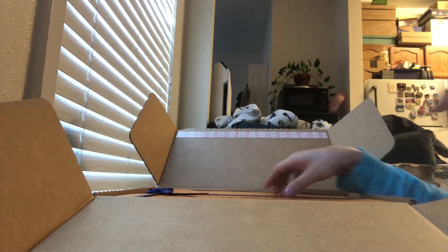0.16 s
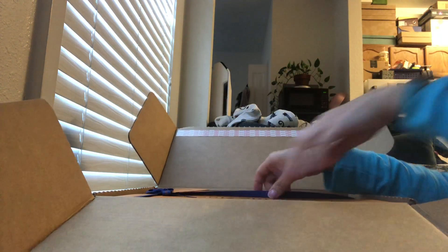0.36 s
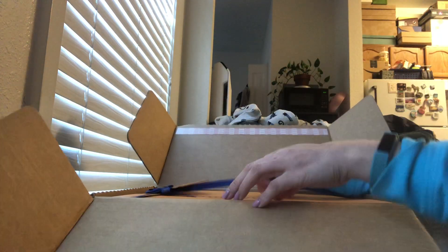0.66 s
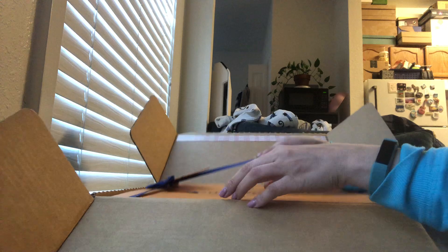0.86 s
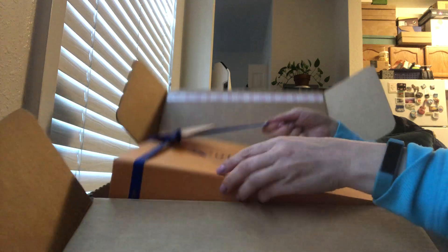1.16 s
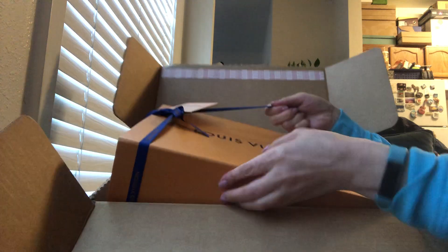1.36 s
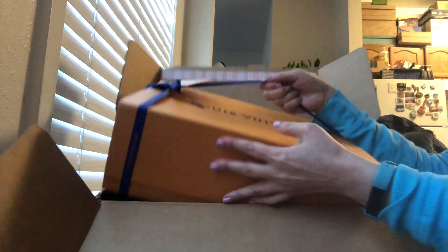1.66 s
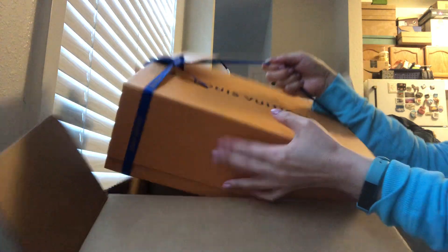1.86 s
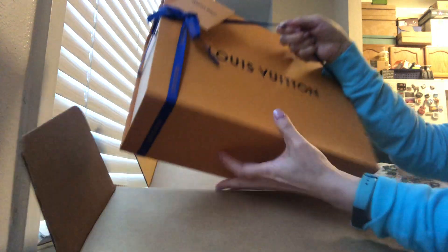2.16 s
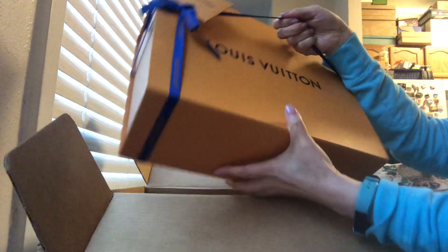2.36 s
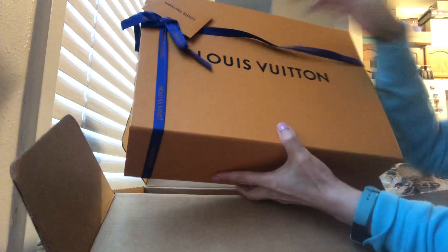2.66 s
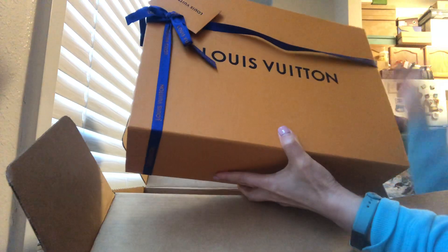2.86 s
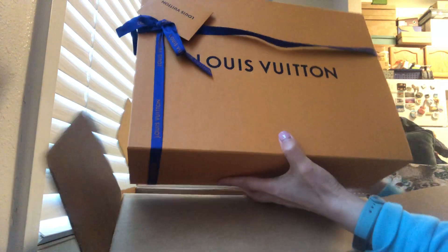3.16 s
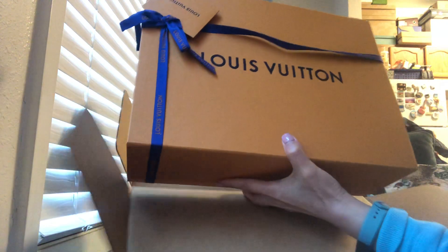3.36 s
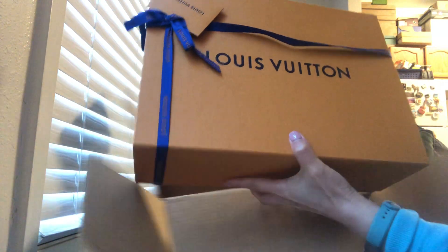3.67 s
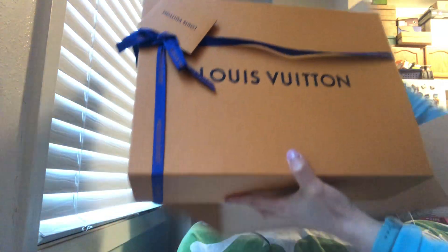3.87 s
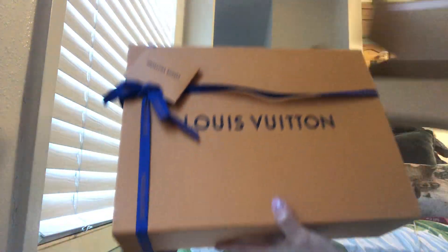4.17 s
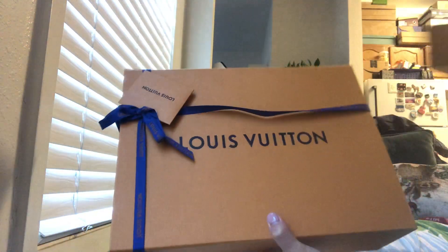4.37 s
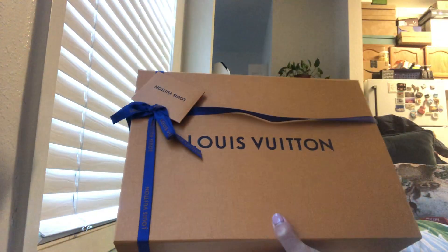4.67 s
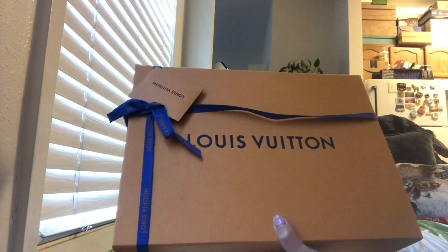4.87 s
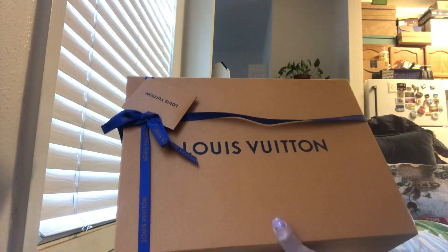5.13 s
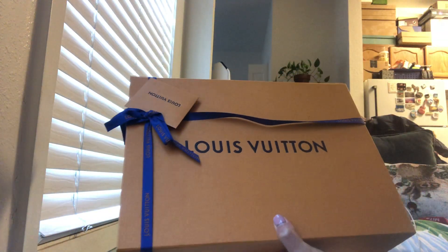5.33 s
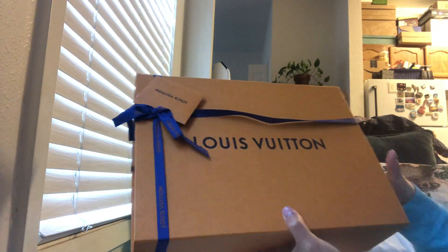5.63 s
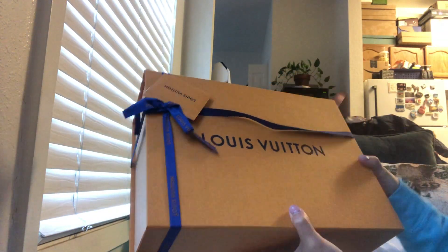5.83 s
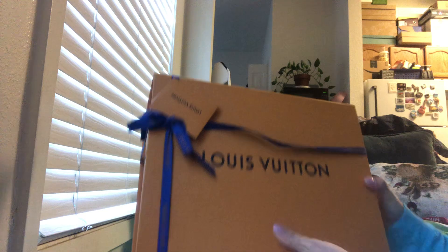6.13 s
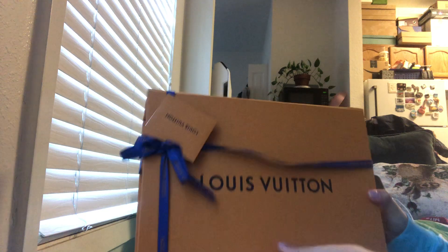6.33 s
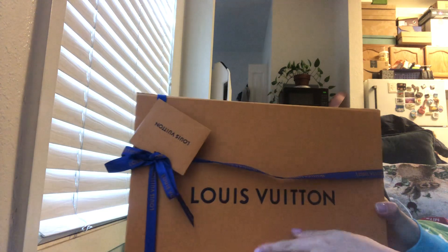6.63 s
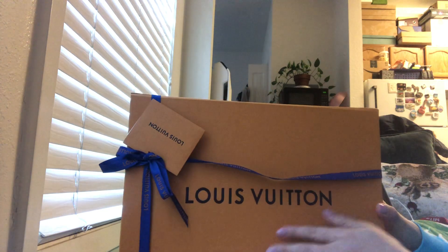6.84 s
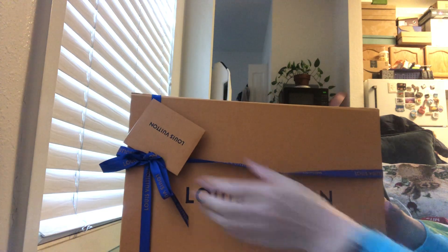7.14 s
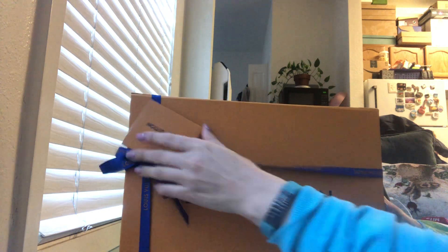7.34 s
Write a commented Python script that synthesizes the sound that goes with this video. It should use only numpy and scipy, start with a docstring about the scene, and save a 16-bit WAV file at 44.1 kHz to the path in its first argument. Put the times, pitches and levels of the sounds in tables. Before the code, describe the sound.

Dry card-on-card sliding with small clicks, two hollow thumps and further carton bumps, then quiet handling rustles and one sharp closing tap indoors.

```python
"""Card slides on card as a stiff gift box is pulled out of a corrugated carton; later hands shift and stroke it.
Dense stick-slip clicks drive the modes of the boxes (panels, hollow, boom) and make a dry hiss with small snaps.
The carton is pushed aside and dropped: knocks strike the same modes and add a bright crack.
Skin squeaks once on the glossy card, as a short sine; shaped noise is the quiet living room."""
import sys
import numpy as np
from scipy import signal
from scipy.fft import rfft, irfft
from scipy.io import wavfile
from scipy.ndimage import uniform_filter1d

SR = 44100
rng = np.random.default_rng(int(sys.argv[2]) if len(sys.argv) > 2 else 0)


def master_out(mix):
    """Clip the mix to full scale and print it as 16-bit PCM to the path in sys.argv[1]."""
    frames = np.transpose(np.atleast_2d(mix))
    ceiling = np.clip(frames, -1, 1)
    pcm = np.round(ceiling * 32767).astype(np.int16)
    wavfile.write(sys.argv[1], SR, pcm)


N = 330750

# Room tone spectrum: f/Hz, relative density/(dB per Hz)
ROOM_SPECTRUM = [(15, -38), (25, -29), (82, 10), (141, -3), (263, 1.5), (796, -9), (936, -9.5),
                 (1560, -16.5), (4870, -19), (14800, -30), (16000, -24)]
# Squeak of skin on glossy card: start t/s, length/s, f/Hz, peak level/dB
SKIN_SQUEAK = (7.168, .028, 1900, -62)
# Modes of the boxes, in three families: f/Hz, relative level/dB, T60/s
BOOM_MODES = [(55, -24.5, 0.99), (75.5, 0, 0.43), (109.7, -15.5, 0.15)]
HOLLOW_MODES = [(138.4, -7, 0.41), (183, 6.5, 0.24), (220.2, 3.5, 0.14), (252.6, 11.5, 0.13),
                (312.3, 2.5, 0.15), (370, 4.5, 0.14)]
PANEL_MODES = [(426, 15, 0.031), (530, 2, 0.069), (623.4, -0.5, 0.044), (710.6, 12, 0.023),
               (808, 6.5, 0.03), (946, 10.5, 0.027), (1072, 9.5, 0.03), (1202, 10.5, 0.019),
               (1324, 10.5, 0.018), (1495, 0, 0.067), (1570, 2.5, 0.018), (1860, -1, 0.065),
               (1960, -6.5, 0.09), (2463, -1.5, 0.047)]
# Knocks and snaps: t/s, panels peak level/dB, centre of excited panel modes f/Hz,
# hollow re panels/dB, centre of excited hollow modes f/Hz, boom re panels/dB, crack re panels/dB
KNOCK_EVENTS = [(0.063, -49, 480, -10, 172, -25, -20), (0.127, -52, 670, -14, 240, -4, 4),
                (0.24, -52, 616, -7, 395, -17, -19), (0.341, -42, 930, -27, 261, -32, -16),
                (0.49, -42, 1180, -7, 283, -35, -17), (0.701, -50, 454, 6.5, 382, -13, -19),
                (0.743, -41.5, 651, -13, 299, -25, -6), (0.773, -42, 611, -9, 196, -31, -17),
                (0.819, -37.5, 660, -11, 180, -32, -9.5), (0.859, -37, 595, -21, 180, -30, -17),
                (1.092, -51, 1120, -3, 180, -11.5, 4.5), (1.441, -40, 2060, -10, 229, -32, -15),
                (1.459, -37, 1350, -35, 175, -40, -19), (1.64, -38.5, 433, -0.5, 188, -45, -14),
                (1.912, -36.5, 660, 6, 371, -20, -23), (1.924, -55, 716, 17.5, 229, -20, -16),
                (2.017, -19.5, 580, -7.5, 212, -16, -16), (2.056, -32.5, 686, -2, 170, -13, 1),
                (2.065, -40, 433, -5, 194, -15, -12), (2.082, -18, 506, -2.5, 236, -30, -7.5),
                (2.276, -36.5, 990, -11.5, 295, -33, 4), (2.289, -33, 1210, -25, 175, -28, -17),
                (2.474, -45.5, 433, 4.5, 235, -13, -16), (2.625, -49.5, 845, -11, 264, -36, -10),
                (2.667, -45.5, 1140, -9.5, 183, -27, -3), (2.721, -46.5, 1200, -13, 398, -35, 0),
                (2.746, -48, 1220, -14, 261, -28, 0), (2.79, -57.5, 550, -2, 296, -9, 5.5),
                (3.03, -38, 430, 6, 403, -8, -21), (3.339, -42.5, 567, 6.5, 209, -8, -16),
                (3.603, -24.5, 802, -2.5, 217, -6, -5), (3.794, -25.5, 535, -10.5, 320, -29, -6),
                (3.832, -34, 960, -1, 180, -38, -2.5), (3.956, -44, 433, -20, 202, -35, -37),
                (4.057, -60.5, 533, -10, 242, 9.5, -14), (4.249, -55, 576, -6, 205, -13, -13),
                (4.647, -50.5, 1060, -15, 358, -19, -8), (4.799, -52, 433, 0, 398, -17, -20),
                (4.853, -52, 1320, 0, 231, -10, -7), (4.99, -38, 1080, -19, 250, -23, -10),
                (5.055, -42, 433, -9, 390, 5, -14), (5.067, -40, 444, -1, 223, 0, -12),
                (5.103, -47, 433, 8, 187, 15.5, -16), (5.503, -51, 940, -21, 398, -18, -6),
                (5.588, -56, 910, -13, 172, -18, -3), (5.618, -45.5, 487, -5, 370, -23, -10),
                (5.881, -38, 440, -2.5, 308, -33, -21), (5.976, -57.5, 1090, -3, 229, -29, 0),
                (5.995, -45, 1050, -8, 299, -22, -5.5), (6.042, -42, 560, -13, 345, -19, -19),
                (6.114, -53, 738, -15, 363, -15, 7), (6.243, -55, 1030, -18, 231, -26, 5.5),
                (6.265, -50, 1160, -14, 366, -28, 1), (6.322, -37.5, 1190, -5, 188, -29, -1.5),
                (6.35, -66, 678, -11, 143, -10, -8), (6.412, -51, 956, 7, 363, -34, 4.5),
                (6.569, -39, 756, -28, 398, -29, -11), (7.064, -42, 1200, -27, 191, -27, -12),
                (7.351, -27, 970, -41, 320, -42, -18)]
# Dry friction spectrum: f/Hz, relative density/(dB per Hz)
HISS_SPECTRUM = [(1060, -23), (1800, -2.5), (2160, -2), (2670, -3), (7700, -11.5), (11500, -19.5),
                 (14600, -12), (16000, 0.5)]
# Rubs of card, ribbon and skin: full strength t/s (sudden rubs move to a knock), rise/s, hold/s,
# panels level/dB, centre of excited panel modes f/Hz, hollow, hiss and fine hiss re panels/dB
RUB_EVENTS = [(0.063, 0.045, 0.012, -58, 590, 1, -8, -25), (0.116, 0.02, 0.0088, -61, 655, 4, -2.5, -11),
              (0.24, 0.0013, 0.1, -41, 825, -7, -9, -28.5), (0.367, 0.032, 0.075, -58, 746, 0, -0.5, -9.5),
              (0.502, 0.042, 0.039, -42.5, 950, -7, -14.5, -30.5),
              (0.584, 0.016, 0.088, -57, 815, 2, -3.5, -13.5),
              (0.738, 0.0047, 0.057, -65.5, 820, -5, 3, -7), (0.835, 0.038, 0.21, -53, 875, 1, -9.5, -20),
              (1.097, 0.005, 0.019, -54.5, 1080, -1, -1, -5), (1.13, 0.023, 0.045, -54, 1050, 1, -7, -13),
              (1.193, 0.038, 0.019, -50.5, 970, -4, 3, -6),
              (1.256, 0.04, 0.11, -51.5, 820, -4, -9.5, -23.5),
              (1.409, 0.069, 0.017, -52.5, 1020, 0.5, -5.5, -19),
              (1.438, 0.015, 0.014, -54, 1100, 0, 2.5, -15.5),
              (1.52, 0.06, 0.091, -49.5, 870, -3.5, -7.5, -17.5),
              (1.638, 0.064, 0.035, -47.5, 830, 4, -5.5, -15.5),
              (1.715, 0.039, 0.18, -49, 705, -6, -9, -18), (1.918, 0.025, 0.15, -52, 855, 1, -2, -9.5),
              (2.017, 0.0022, 0.02, -39, 686, 6, -4.5, -17.5),
              (2.085, 0.0035, 0.055, -44.5, 630, 9.5, -11, -21),
              (2.154, 0.03, 0.085, -50.5, 784, -1, -6, -10.5),
              (2.266, 0.0016, 0.011, -48.5, 1120, -4, -8.5, -15),
              (2.447, 0.12, 0.073, -71, 490, 12, -4, -7), (2.554, 0.09, 0.015, -58.5, 770, -0.5, -5.5, -14),
              (2.623, 0.0084, 0.14, -66, 1010, -8, 1.5, -5.5), (2.832, 0.032, 0.17, -73, 884, -0.5, 0, -2),
              (3.035, 0.0057, 0.12, -48.5, 696, -1, -8, -13),
              (3.14, 0.02, 0.095, -58, 630, 3.5, -10.5, -15), (3.27, 0.056, 0.06, -56.5, 710, 4, -1, -5.5),
              (3.39, 0.09, 0.082, -51.5, 537, -1, -10.5, -15.5),
              (3.528, 0.073, 0.089, -49, 700, 1, -10, -17.5),
              (3.591, 0.0019, 0.039, -41.1, 640, 5.5, -11, -24),
              (3.711, 0.12, 0.015, -46, 880, -11, -5, -10.5),
              (3.742, 0.015, 0.015, -45.5, 1060, -3.5, -1.5, -4),
              (3.821, 0.0029, 0.073, -52.5, 920, 5, -8, -12.5),
              (3.954, 0.01, 0.063, -53, 620, 3.5, -12.5, -21.5), (4.257, 0.02, 0.11, -67, 734, 2, -17, -33),
              (4.447, 0.021, 0.085, -65.5, 590, -0.5, -14, -33),
              (4.645, 0.11, 0.019, -61.5, 1100, -5.5, -3, -11.5),
              (4.703, 0.02, 0.11, -67, 610, -2, -9, -21), (4.853, 0.023, 0.15, -65, 720, 10.5, -5, -34),
              (4.987, 0.0021, 0.038, -47.5, 1010, -6, -5, -18.5),
              (5.057, 0.0041, 0.018, -48, 550, 10.5, -5.5, -11.5),
              (5.121, 0.023, 0.13, -61, 860, 5, -2, -9.5), (5.266, 0.02, 0.076, -73.5, 656, -9, -2, -5),
              (5.505, 0.0029, 0.01, -64, 800, -3, -8, -26), (5.608, 0.015, 0.044, -63, 610, -9, -6.5, -16),
              (5.72, 0.03, 0.3, -76, 580, -9, -7, -25), (5.874, 0.0097, 0.005, -58, 1000, -6, -12, -25),
              (6.037, 0.059, 0.045, -57, 623, -12, -8, -10.5), (6.11, 0.01, 0.19, -69, 860, -7, 2.5, -2),
              (6.32, 0.004, 0.052, -64, 880, 4.5, 3, -5),
              (6.425, 0.027, 0.016, -44, 730, -10.5, -13.5, -21), (6.5, 0.02, 0.065, -61, 810, -5, -6, -16),
              (6.566, 0.028, 0.073, -50, 660, -23, -14, -21),
              (6.647, 0.02, 0.1, -60.5, 645, -3.5, -7.5, -20), (6.79, 0.039, 0.04, -64, 890, -7, -7, -11.5),
              (6.842, 0.048, 0.038, -53, 1160, -12.5, -7, -21),
              (6.924, 0.053, 0.19, -72.5, 790, -10, 2, -2), (7.056, 0.0028, 0.025, -63.5, 815, -5, -1, -6),
              (7.179, 0.021, 0.14, -71.5, 790, 0.5, -7, -25),
              (7.351, 0.001, 0.029, -34.5, 890, -49, -14, -34),
              (7.427, 0.022, 0.038, -60.5, 855, 6, -3, -14), (7.479, 0.015, 0.019, -66, 840, -5, 6, -0.5)]
# How the boxes are held while rubbed: t/s, centre of excited hollow modes f/Hz, boom re hollow/dB
GRIP_PATH = [(0, 180, 8), (.22, 185, -20), (.3, 320, -16.5), (.78, 262, -18), (.9, 186, -16),
             (1.35, 270, -20), (1.66, 200, -43), (1.82, 315, -15), (2.0, 215, -17), (2.8, 260, -3),
             (3.2, 197, -5.5), (3.5, 243, -6), (3.85, 193, -20.5), (4.5, 285, -6), (5.0, 230, -9),
             (5.2, 180, 0), (5.6, 303, -6), (6.1, 335, -5), (6.35, 200, 6), (6.5, 335, -7), (6.9, 250, -2),
             (7.4, 343, -27)]
# Decay rate of a rub/(dB/s): panels, hollow, hiss, fine hiss
RUB_FALL = (280, 215, 278, 320)
# Decay rate of a sudden rub while it holds/(dB/s): panels, hollow, hiss, fine hiss
RUB_SAG = (18, 21, 78, 53)

ROOM_DB = -69.5
MIC_LOW_HZ, STOPBAND_HZ = 46.5, 16200
FOCUS_DB_PER_OCT2 = 6.5  # how fast modes fade away from the excited centre
LAG_CYCLES = 0.78  # low bending waves travel slowly: a struck mode answers after this many of its cycles
SKIRT_OCT = 0.72  # the box radiates little this far beyond a family's outer modes
CONTACT_T60_S, CRACK_T60_S, CRACK_RISE_S = 0.021, 0.02, 0.0012
CRACK_LEAD_S = 0.002  # the edge cracks just before the wall gives
SLIPS_PER_S, SLIP_SPREAD_DB, CLUMP_DB = 11000, 2.6, 1.1
TICKS_PER_S, TICK_DB, TICK_T60_S = 25, -5, 0.012  # small folds snap; gain re hiss before each size
FINE_ABOVE_HZ, PATCH_DB = 6920, 2.4  # start of the fine hiss; wander of each hiss band
RISE_DB = 25.5  # a rub rises by this much over its rise time
SUDDEN_S = 0.008  # a rub that rises faster than this is set off by the nearest knock


def amp(db):
    """Logarithmic level: amplitude gain is ten to the power dB/20."""
    return 10 ** (np.asarray(db) / 20)


def rms_one(x):
    """Power normalisation: scale to rms 1."""
    return x / np.sqrt(np.mean(x ** 2) + 1e-20)


def peak_one(x):
    """Peak normalisation: scale to peak 1."""
    return x / (np.max(np.abs(x)) + 1e-20)


def colour(x, spectrum):
    """Spectral shaping: weight each frequency by a table of (f/Hz, dB per Hz); rms 1."""
    hz = np.maximum(np.arange(len(x) // 2 + 1) * SR / len(x), 1)
    table_hz, table_db = np.transpose(spectrum)
    gain = amp(np.interp(np.log(hz), np.log(table_hz), table_db))
    return rms_one(irfft(rfft(x) * gain, len(x)))


def drift(rate_hz):
    """Low-passed chance: a random signal of spread 1 that changes about rate_hz times a second."""
    step = 40  # samples between computed points
    pole = np.exp(-2 * np.pi * rate_hz * step / SR)
    noise = rng.standard_normal(N // step + 2002)
    slow = signal.lfilter([1], [1, -2 * pole, pole * pole], noise)[2000:]  # drop the start-up
    return np.interp(np.arange(N) / step, np.arange(len(slow)), rms_one(slow))


def ring(force, modes, extra_db, lag_cycles=0):
    """Modal superposition: a force drives damped resonators, band-limited to what the box radiates."""
    total = 0
    for (hz, db, t60), more_db in zip(modes, extra_db):
        radius = amp(-60 / (t60 * SR))
        angle = 2 * np.pi * hz / SR
        lag = int(lag_cycles * SR / hz)
        late = np.concatenate([np.zeros(lag), force[:len(force) - lag]])
        poles = [1, -2 * radius * np.cos(angle), radius * radius]
        mode = signal.lfilter([0, np.sin(angle)], poles, late + 1e-18)
        total = total + amp(db + more_db) * mode
    edges = [modes[0][0] / 2 ** SKIRT_OCT, modes[-1][0] * 2 ** SKIRT_OCT]
    return signal.sosfilt(signal.butter(3, edges, "band", fs=SR, output="sos"), total)


def focus_db(modes, centre_hz):
    """Selective excitation: modes far from centre_hz respond less, while the summed power is conserved."""
    hz, db, t60 = np.transpose(modes)
    octaves = np.log2(np.multiply.outer(hz, 1 / np.asarray(centre_hz)))
    weight_db = -FOCUS_DB_PER_OCT2 * octaves ** 2
    power = np.tensordot(amp(2 * db) * t60, amp(2 * weight_db), axes=1)
    return weight_db - 10 * np.log10(power)


def room():
    """Stationary ambient noise: coloured air noise of almost constant level."""
    air = colour(rng.standard_normal(N), ROOM_SPECTRUM)
    return amp(ROOM_DB + 0.19 * drift(0.24)) * air


def squeak():
    """Near-periodic friction: a single sine under a parabolic swell."""
    start_s, length_s, hz, db = SKIN_SQUEAK
    t = np.arange(N) / SR - start_s
    swell = np.maximum(1 - (2 * t / length_s - 1) ** 2, 0)
    return amp(db) * swell * np.sin(2 * np.pi * hz * t)


def knocks():
    """Impact excitation: rough contact drives panels and crack; a soft push drives hollow and boom."""
    out, long, short = np.zeros(N + SR), SR // 2, SR // 7
    t = np.arange(long) / SR
    t_short = t[:short]
    bright = signal.butter(1, [1300, 3000], "band", fs=SR, output="sos")
    push = t * np.exp(-t / 0.00024)  # the whole wall bends
    contact_decay = amp(-60 * t_short / CONTACT_T60_S)
    crack_swell = (1 - np.exp(-t_short / CRACK_RISE_S)) * amp(-60 * t_short / CRACK_T60_S)
    for s, panels_db, panels_hz, hollow_db, hollow_hz, boom_db, crack_db in KNOCK_EVENTS:
        rough = rng.standard_normal(short)
        rough[0] = 4  # the first touch is hard
        # every knock meets the modes with strengths spread by 4 dB
        panels_extra, hollow_extra, boom_extra = [
            rng.normal(0, 4.0, len(modes)) for modes in (PANEL_MODES, HOLLOW_MODES, BOOM_MODES)]
        panels_extra += focus_db(PANEL_MODES, panels_hz)
        hollow_extra += focus_db(HOLLOW_MODES, hollow_hz)
        panels = peak_one(ring(rough * contact_decay, PANEL_MODES, panels_extra, LAG_CYCLES))
        hollow = peak_one(ring(push, HOLLOW_MODES, hollow_extra, LAG_CYCLES))
        boom = peak_one(ring(push, BOOM_MODES, boom_extra, LAG_CYCLES))
        crack = peak_one(signal.sosfilt(bright, rough * crack_swell))
        at = round(s * SR)
        early = at - round(CRACK_LEAD_S * SR)
        out[early:early + short] += amp(panels_db + crack_db) * crack
        out[at:at + short] += amp(panels_db) * panels
        out[at:at + long] += amp(panels_db) * (amp(hollow_db) * hollow + amp(boom_db) * boom)
    return out[:N]


def ticks():
    """Random impulses with exponential decay: the envelope of sparse snaps of uneven size."""
    sizes = amp(5.16 * np.minimum(rng.exponential(1, N), 3))
    snaps = sizes * (rng.random(N) < TICKS_PER_S / SR)
    return signal.lfilter([1], [1, -amp(-60 / (TICK_T60_S * SR))], snaps + 1e-18)


def slips():
    """Stick-slip friction: tiny clicks of uneven size and random sign that come in clumps."""
    sizes = amp(SLIP_SPREAD_DB * np.minimum(rng.exponential(1, N), 5))
    clicks = sizes * rng.choice([-1, 1], N) * (rng.random(N) < SLIPS_PER_S / SR)
    return clicks * amp(CLUMP_DB * drift(22.0))


def steady(x, over_s):
    """Partial levelling: swells much longer than over_s are held down; rms 1."""
    local_power = uniform_filter1d(x ** 2, int(over_s * SR))
    return rms_one(x / (local_power + 1e-20) ** 0.34)


def patchy(x, low_hz, high_hz, count):
    """Independent band modulation: bands of x swell and fade by themselves; rms 1."""
    edges = np.geomspace(low_hz, high_hz, count + 1)
    total = 0
    for k, pair in enumerate(zip(edges, edges[1:])):
        band = signal.sosfilt(signal.butter(2, pair, "band", fs=SR, output="sos"), x)
        total = total + amp(PATCH_DB * drift(13.5)) * band * (-1) ** k  # neighbours alternate in sign
    return rms_one(total)


def strokes():
    """Addition of powers: rubs rise, hold and die away; the strongest mostly sets the panel centre."""
    step = 44  # samples between computed points
    t = np.arange(0, N + step, step) / SR
    s, rise, hold, db, hz, hollow, hiss, fine = np.array(RUB_EVENTS).T[:, :, None]
    sudden = rise < SUDDEN_S
    knock_s = np.array(KNOCK_EVENTS)[:, 0]
    nearest_s = knock_s[np.abs(s - knock_s).argmin(axis=1), None]
    s = np.where(sudden, nearest_s - CRACK_LEAD_S + rise, s)
    before = np.maximum(s - t, 0) / np.maximum(rise, 0.001)
    after = np.maximum(t - s - hold, 0)
    held = np.clip(t - s, 0, hold) * sudden
    powers = []
    for re_db, fall, sag in zip((0, hollow, hiss, fine), RUB_FALL, RUB_SAG):
        level_db = db + re_db - RISE_DB * before - fall * after - sag * held
        powers.append(amp(2 * level_db) + 1e-12)
    centre_hz = np.exp(np.sum(powers[0] * np.log(hz), axis=0) / np.sum(powers[0], axis=0))
    gains = [np.sqrt(p.sum(axis=0)) for p in powers]
    return [np.interp(np.arange(N) / SR, t, curve) for curve in [centre_hz] + gains]


def sliding():
    """Friction-driven resonance: slips excite wandering modes and are heard directly as dry hiss."""
    panels_hz, panels_gain, hollow_gain, hiss_gain, fine_gain = strokes()
    grip_s, *held = np.transpose(GRIP_PATH)
    hollow_hz, boom_db = [np.interp(np.arange(N) / SR, grip_s, column) for column in held]
    # each mode swells by itself as the contact wanders
    panels_extra = [db + 4.5 * drift(9) for db in focus_db(PANEL_MODES, panels_hz)]
    hollow_extra = [db + 4 * drift(5) for db in focus_db(HOLLOW_MODES, hollow_hz)]
    panels = steady(ring(slips(), PANEL_MODES, panels_extra), 0.03)
    hollow = steady(ring(slips(), HOLLOW_MODES, hollow_extra), 0.06)
    boom = steady(ring(slips(), BOOM_MODES, np.zeros(len(BOOM_MODES))), 0.058)
    friction = colour(slips(), HISS_SPECTRUM) * (1 + amp(TICK_DB) * ticks())
    hiss = patchy(friction, 1530, FINE_ABOVE_HZ, count=6)
    fine = patchy(friction, FINE_ABOVE_HZ, 14640, count=3)
    body = panels_gain * panels + hollow_gain * (hollow + amp(boom_db) * boom)
    return body + hiss_gain * hiss + fine_gain * fine


def scene():
    """Linear superposition: room tone, squeak, knocks and sliding add in one channel."""
    return (room() + squeak() + knocks() + sliding())[None]


def record(dry):
    """Band limitation: the microphone loses the deep bass and the extreme treble is cut."""
    thin = signal.sosfilt(signal.butter(6, MIC_LOW_HZ, "high", fs=SR, output="sos"), dry)
    return signal.sosfilt(signal.cheby2(16, 70, STOPBAND_HZ, fs=SR, output="sos"), thin)


dry = scene()
out = record(dry)
master_out(out)
```